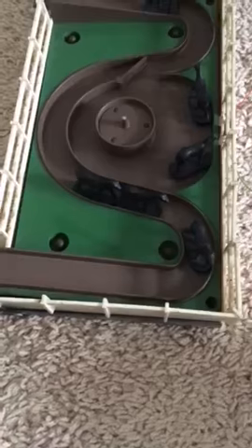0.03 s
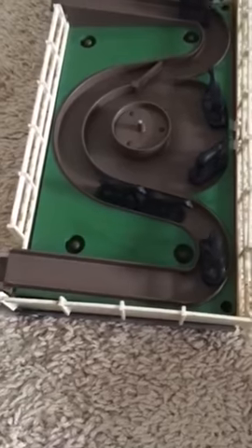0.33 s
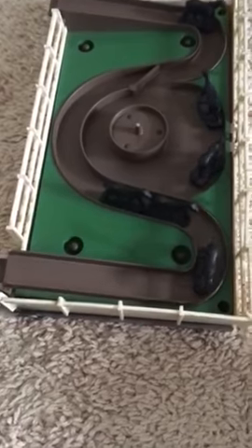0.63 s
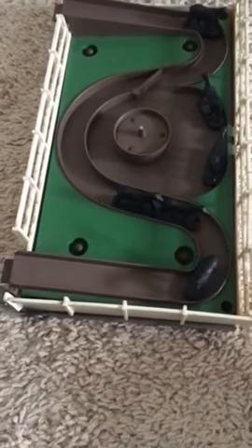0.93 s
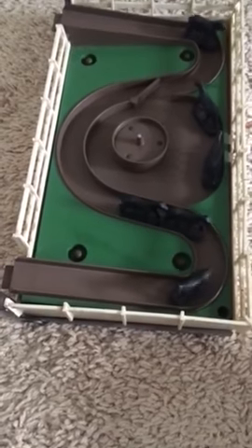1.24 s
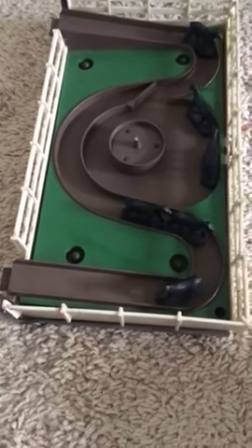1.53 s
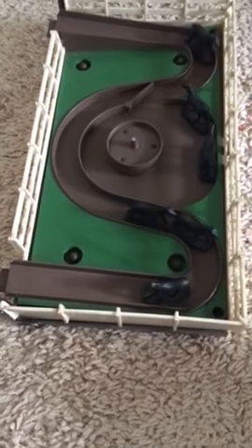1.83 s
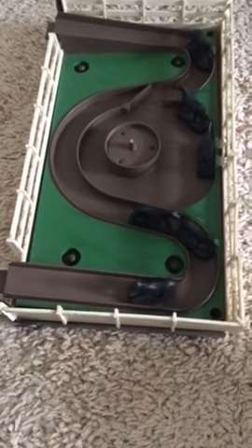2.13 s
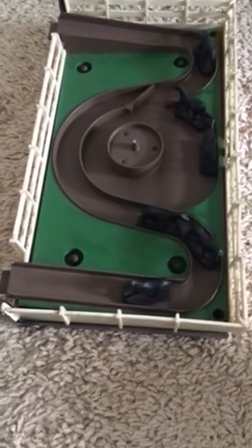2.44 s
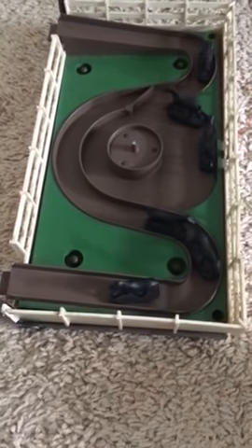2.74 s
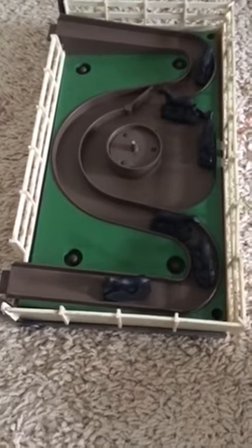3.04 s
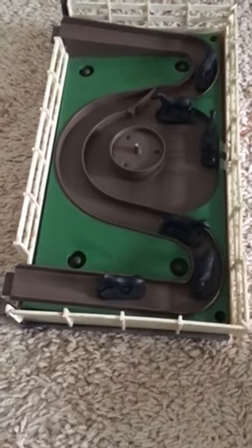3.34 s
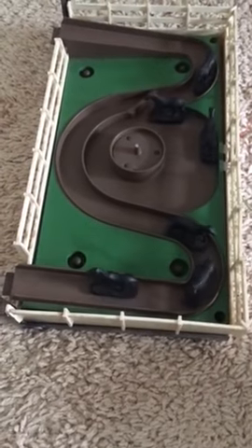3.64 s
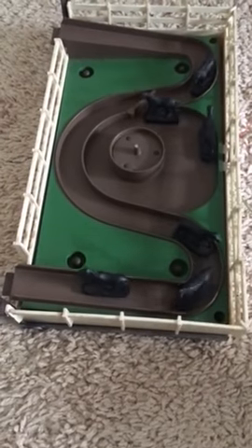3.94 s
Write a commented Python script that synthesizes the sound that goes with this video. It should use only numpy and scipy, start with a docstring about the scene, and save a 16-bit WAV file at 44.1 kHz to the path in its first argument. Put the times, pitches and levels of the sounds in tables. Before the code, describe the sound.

A vibrating plastic toy track buzzes steadily while small figures rattle along it.

```python
"""A mains-driven vibrator shakes a plastic toy track on a carpet; small figures creep along it.
The sound cuts in mid-run: the tray knocks 120 times a second, strong and weak by turns, and rings near
1 kHz; loose parts clatter, figures chatter, the coil hums over a faint room drone and rumble.
Harder knocks land at 0.74 and 1.24 s. The drone recedes at 1.8 s. From 2.6 s one figure's shrill tick
comes forward, with one more hard knock at 3.25 s."""
import sys
import numpy as np
from scipy import signal
from scipy.fft import rfft, irfft
from scipy.io import wavfile

SR = 44100
rng = np.random.default_rng(int(sys.argv[2]) if len(sys.argv) > 2 else 0)


def to_wav(sig):
    """Store sig (one row per channel, or 1-D mono) as 16-bit WAV at the path in sys.argv[1].

    Samples outside -1..1 are clipped; the rate is SR.
    """
    pcm = np.clip(np.atleast_2d(sig), -1, 1) * 32767
    pcm = np.round(pcm).astype(np.int16)
    wavfile.write(sys.argv[1], SR, pcm.T)  # frames by channels


N = 176400

STROKE_HZ, FIRST_STROKE_S = 120.053, .0009
LIMP_DEPTH, KNOCK_SCATTER_DB, KNOCK_JITTER_S, LATE_S_PER_DB = .95, 1.05, .00005, .000028
SWING_HZ, SWING_S, SWING_STOP_S = 975, .0042, .0008
CLATTER_T60_S, CLATTER_BUILD_S = .021, .0006
CHATTER_T60_S, CHATTER_BUILD_S = .016, .0016
TUMBLE_HZ, TUMBLE_DB = 55, -.5
MAINS_DB, DRONE_HZ, RUMBLE_DB = -64, 91, -55
ROOM_DB, ROOM_T60_S = -12.5, .18
START_S, CUTOFF_HZ = .084, 17100
TRIM_DB = .5  # added to the knock, clatter and chatter levels

# odd knocks over even, before LIMP_DEPTH: time_s, excess_db
KNOCK_LIMP = [(0.09, 2.4), (0.29, 4.4), (0.34, -0.3), (0.52, -2.3), (0.55, 4.8), (0.6, -4.3), (0.65, 4.4),
              (0.74, -6.2), (0.9, -5.0), (1.04, 10.3), (1.14, 6.5), (1.19, -0.9), (1.32, 7.1), (1.5, 2.3),
              (1.55, 6.2), (1.65, 1.5), (1.72, 6.7), (1.87, 4.9), (2.0, -3.0), (2.14, 4.4), (2.29, 8.2),
              (2.35, -6.9), (2.49, -5.2), (2.57, 5.5), (2.74, 5.8), (2.84, -7.5), (3.0, -2.2), (3.14, 7.0),
              (3.34, 2.9), (3.4, -7.8), (3.55, 6.5), (3.67, 7.5), (3.8, 0.0), (3.99, -0.0)]
# single harder knocks: time_s, extra_db
HARD_KNOCKS = [(.742, 2), (1.243, 3), (3.249, 2.5)]
# knock envelope: time_s, level_db
KNOCK_LEVEL = [(.1, -28), (.14, -28.5), (.25, -25.5), (.33, -27.3), (.55, -26), (.8, -26.3), (.87, -25.2),
               (1.05, -25.2), (1.14, -27.3), (1.27, -25.3), (1.35, -27.2), (1.7, -26.3), (1.82, -27.7),
               (1.88, -25.2), (2.02, -27), (2.16, -25), (2.25, -26.2), (2.35, -25.2), (2.5, -27),
               (2.66, -25.5), (2.78, -26.6), (2.87, -25), (2.96, -26.5), (3.03, -25.6), (4, -26.3)]
# tray response: freq_hz, gain_db
TRAY_COLOUR = [(100, -23), (380, -21), (425, -6), (480, 7), (540, 8), (600, -4), (660, 4), (720, 7),
               (780, 4.5), (840, 2.2), (900, 1.8), (960, .6), (1020, 2.5), (1080, 4), (1140, -1),
               (1200, 4.5), (1260, -6), (1320, 2.3), (1450, 3.5), (1560, -6), (2000, -7), (3000, -10),
               (8000, -25)]
# narrow tray modes: freq_hz, t60_s, level_db
TRAY_MODES = [(540, .15, -53), (1620, .14, -48.5), (1680, .14, -54.5), (1802, .14, -51.5), (1924, .1, -58),
              (1981, .1, -56.5), (2403, .08, -57)]

# loose-part hits: phase_strokes, gain_db
LOOSE_PARTS = [(.92, 0), (.08, -1), (.34, -1.5), (.65, -5)]
# loose-part response: freq_hz, gain_db
CLATTER_COLOUR = [(200, -26), (550, -6), (1000, -2), (1350, 0), (1500, -3.5), (1950, -3), (2150, -4.5),
                  (2320, -12), (2450, -9), (2800, -20), (4000, -26), (9000, -50)]
# loose-part modes: freq_hz, t60_s, gain_db
CLATTER_MODES = [(1620, .08, -15), (2425, .06, -13.5), (2470, .05, -18), (3050, .07, -17.5),
                 (3245, .07, -21)]
# clatter envelope: time_s, level_db
CLATTER_LEVEL = [(0.1, -43), (0.25, -38), (0.47, -44), (0.54, -40), (0.74, -40), (0.8, -44), (0.87, -39),
                 (1.21, -43), (1.29, -38), (1.37, -42), (2.6, -41), (2.78, -43), (2.89, -39), (3.98, -41)]

# figure landings per two-stroke cycle: phase_cycles, gain_db
FIGURES = [(.25, -6), (.77, -5)]
# liveliest figure's double landing: phase_strokes, gain_db
HOPPER = [(.78, 1.5), (.04, 0)]
# its bias to one stroke of each pair: time_s, bias_db
HOPPER_LIMP = [(.1, 6), (.7, 12), (.82, -3), (.95, 8), (1.08, -12), (1.28, -12), (1.38, 2), (2.9, 2),
               (3.1, 6), (3.35, 0), (3.6, 10), (3.8, -2)]
# figure response: freq_hz, gain_db
CHATTER_COLOUR = [(500, -20), (2000, -3), (3200, -2), (4000, -2.5), (5100, -2.5), (6400, 1), (7500, -1.5),
                  (8600, 1), (9600, -3), (10300, -6), (11000, -3.2), (13000, -3.8), (15400, -6.5),
                  (17000, -16)]
# figure modes: freq_hz, t60_s, gain_db
CHATTER_MODES = [(3660, .05, -21), (4390, .05, -19.5), (5130, .05, -22), (5790, .045, -13.5),
                 (6120, .06, -21), (6440, .04, -15), (6770, .03, -14.5), (7255, .045, -17),
                 (7905, .035, -12.5), (8270, .04, -13), (8660, .04, -15)]
# chatter envelope: time_s, level_db
CHATTER_LEVEL = [(.1, -42), (.12, -46), (.16, -42), (.27, -40.5), (.36, -45), (.66, -41.5), (.78, -46.5),
                 (.87, -39.5), (.95, -44), (1.38, -44), (1.44, -41), (1.51, -44.5), (1.57, -41),
                 (1.68, -43.5), (1.87, -41), (1.95, -44.5), (2.09, -45), (2.15, -41), (2.26, -44),
                 (2.36, -42.5), (2.46, -46), (2.64, -42.5), (2.75, -44), (3.4, -43.5), (4, -42)]

# coil harmonics of the stroke rate: time_s, first_db, second_db, third_db
HUM_LEVELS = [(0.1, -54.5, -53, -55), (.9, -54.5, -55, -53), (.98, -54.5, -49, -58),
              (1.55, -54.5, -54.5, -58.5), (1.72, -54.5, -49.5, -58.5), (1.9, -55, -52.5, -58.5),
              (4, -55, -51, -58.5)]
# room drone envelope: time_s, level_db
DRONE_LEVEL = [(0, -54), (.9, -51), (1.7, -54), (1.8, -61), (4, -63)]
# room rumble spectrum: freq_hz, gain_db
RUMBLE_COLOUR = [(20, -30), (32, -14), (42, 3), (60, 1), (100, -5), (140, -8), (190, -1), (300, -7),
                 (600, -10), (2000, -22), (16000, -40)]

# shrill figure's response: freq_hz, gain_db
SHRILL_COLOUR = [(2000, -22), (8000, -12), (8900, -2), (9400, -12), (16000, -14)]
# its modes: freq_hz, t60_s, gain_db
SHRILL_MODES = [(8930, .04, -3), (9080, .03, -7)]
# its envelope: time_s, level_db
SHRILL_LEVEL = [(0, -66), (2.6, -62), (3.25, -55), (3.45, -49.5), (4, -49.5)]


def undb(db):
    """Decibels to gain."""
    return 10 ** (np.asarray(db) / 20)


def unit(x):
    """Scale to rms 1."""
    return x / np.sqrt(np.mean(x ** 2))


def curve(rows, t, column=1):
    """Table column interpolated at times t."""
    rows = np.array(rows)
    return np.interp(t, rows[:, 0], rows[:, column])


def wander(t, rate_hz):
    """Slow random drift, spread near 1."""
    return 1.2 * np.interp(t * rate_hz, np.arange(512), rng.standard_normal(512))


def colour(x, response):
    """Minimum-phase filter from freq_hz, gain_db rows."""
    hz, db = np.array(response).T
    bins_hz = np.arange(4097) * SR / 8192
    log_gain = np.log(undb(np.interp(np.log(bins_hz + 1), np.log(hz), db)))
    cepstrum = irfft(log_gain)
    cepstrum[1:4096] *= 2
    cepstrum[4097:] = 0
    return signal.fftconvolve(x, irfft(np.exp(rfft(cepstrum))))[:len(x)]


def pulses(times_s, db):
    """Windowed-sinc impulses placed between samples."""
    at = times_s[:, None] * SR
    taps = np.floor(at).astype(int) + np.arange(-7, 9)
    shape = np.sinc(taps - at) * np.sinc((taps - at) / 8) * undb(db)[:, None]
    inside = (taps >= 0) & (taps < N)
    return np.bincount(taps[inside], shape[inside], N)


def fade(t60_s, size=8192):
    """Exponential decay of unit energy."""
    decay = np.exp(-np.log(1000) * np.arange(size) / SR / t60_s)
    return decay / np.sqrt(np.sum(decay ** 2))


def ring(hits, modes):
    """Damped modes struck by the hits."""
    total = 0
    for hz, t60_s, db in modes:
        pole = np.exp((2j * np.pi * hz - np.log(1000) / t60_s) / SR)
        total += undb(db) * unit(signal.lfilter([1, 0, -1], [1, -2 * pole.real, abs(pole) ** 2], hits))
    return total


def bounces(rate_hz, parts, jitter_s, scatter_db, drift_db, drift_hz, limp_db):
    """Hit times and strengths of parts locked to the vibrator, at times high and low by turns."""
    cycle = np.arange(int(N / SR * rate_hz) + 1)
    cycle_s = cycle / rate_hz
    times_s, hits_db = [], []
    for phase, db in parts:
        jitter, scatter = rng.standard_normal((len(cycle), 2)).T
        times_s.append((cycle + phase) / rate_hz + jitter_s * jitter)
        swing_db = limp_db * (-1) ** cycle * np.tanh(2 * wander(cycle_s, drift_hz / 2))
        hits_db.append(db + swing_db + scatter_db * scatter + drift_db * wander(cycle_s, drift_hz))
    return times_s, hits_db


def rattle(times_s, hits_db, response, modes, t60_s, build_s, scrape):
    """Hits on plastic: dense short ring, a few clear modes, fresh scrape noise per hit."""
    hits = pulses(np.concatenate(times_s), np.concatenate(hits_db))
    envelope = fade(t60_s)
    envelope *= 1 - np.exp(-np.arange(len(envelope)) / SR / build_s)
    body = signal.fftconvolve(hits, envelope * rng.standard_normal(len(envelope)))[:N]
    energy = np.abs(signal.fftconvolve(hits ** 2, envelope ** 2)[:N])
    grit = np.sqrt(energy) * rng.standard_normal(N)
    return unit(unit(colour(body + scrape * grit, response)) + ring(hits, modes))


def tray_knocks(t):
    """One knock per stroke, strong and weak by turns; a higher bounce lands later."""
    stroke = np.arange(int(N / SR * STROKE_HZ) + 1)
    times_s = FIRST_STROKE_S + stroke / STROKE_HZ
    limp_db = LIMP_DEPTH * curve(KNOCK_LIMP, times_s)
    db = (stroke % 2 - .5) * limp_db + KNOCK_SCATTER_DB * rng.standard_normal(len(stroke))
    for at_s, extra_db in HARD_KNOCKS:
        db[np.argmin(abs(times_s - at_s))] += extra_db
    times_s = times_s + LATE_S_PER_DB * db + KNOCK_JITTER_S * rng.standard_normal(len(stroke))
    pair_db = 10 * np.log10(np.cosh(limp_db * np.log(10) / 20))
    knocks = pulses(times_s, db - pair_db)  # pair energy independent of limp
    # the tray's swing swells until the next contact stops it
    age_s = np.arange(512) / SR
    swell = np.interp(age_s, [0, SWING_S, SWING_S + SWING_STOP_S], [.55, 1, 0])
    swings = signal.fftconvolve(knocks, swell * np.sin(2 * np.pi * SWING_HZ * age_s))[:N]
    body = unit(colour(swings, TRAY_COLOUR)) * undb(curve(KNOCK_LEVEL, t) + TRIM_DB)
    return body + ring(knocks, TRAY_MODES)


def loose_clatter(t):
    """Loose parts strike the track once per stroke, in flurries."""
    times_s, hits_db = bounces(STROKE_HZ, LOOSE_PARTS, jitter_s=.00016, scatter_db=2.4,
                               drift_db=1.2, drift_hz=8, limp_db=.8)
    clatter = rattle(times_s, hits_db, CLATTER_COLOUR, CLATTER_MODES,
                     CLATTER_T60_S, CLATTER_BUILD_S, scrape=.7)
    return clatter * undb(curve(CLATTER_LEVEL, t) + TRIM_DB)


def figure_chatter(t):
    """Figures hop and land about every second stroke, ticking brightly."""
    times_s, hits_db = bounces(STROKE_HZ / 2, FIGURES, jitter_s=.0004, scatter_db=2.4,
                               drift_db=1.8, drift_hz=9, limp_db=1.5)
    # the liveliest lands twice in quick succession
    stroke = np.arange(int(N / SR * STROKE_HZ))
    for landing, (phase, db) in enumerate(HOPPER):
        at_s = (stroke + landing + phase) / STROKE_HZ + .0001 * rng.standard_normal(len(stroke))
        bias = undb((-1) ** stroke * curve(HOPPER_LIMP, at_s))
        share_db = 20 * np.log10(bias / np.hypot(1, bias))
        times_s.append(at_s)
        hits_db.append(db + share_db + 2.1 * rng.standard_normal(len(stroke)) + 1.4 * wander(at_s, 14))
    # another tumbles out of step
    jitter, scatter = rng.standard_normal((300, 2)).T
    times_s.append(np.cumsum(np.exp(.12 * jitter)) / TUMBLE_HZ)
    hits_db.append(TUMBLE_DB + 2.2 * scatter)
    chatter = rattle(times_s, hits_db, CHATTER_COLOUR, CHATTER_MODES,
                     CHATTER_T60_S, CHATTER_BUILD_S, scrape=.7)
    return chatter * undb(curve(CHATTER_LEVEL, t) + TRIM_DB)


def coil_hum(t):
    """Wavering harmonics of the mains, which runs at half the stroke rate."""
    partials = [(.5, MAINS_DB)] + [(k, curve(HUM_LEVELS, t, column=k)) for k in (1, 2, 3)]
    hum = 0
    for ratio, db in partials:
        peak = np.sqrt(2) * undb(db + 1.1 * wander(t, 9))
        hum += peak * np.sin(2 * np.pi * (ratio * STROKE_HZ * t + rng.random()))
    return hum


def room_background(t):
    """Low drone over noise rumble."""
    phase_rad = 2 * np.pi * DRONE_HZ * t + .4 * wander(t, 6)
    drone = np.sqrt(2) * undb(curve(DRONE_LEVEL, t)) * np.sin(phase_rad)
    return drone + undb(RUMBLE_DB) * unit(colour(rng.standard_normal(N), RUMBLE_COLOUR))


def shrill_figure(t):
    """One figure's 9 kHz tick comes forward as it creeps on."""
    times_s, hits_db = bounces(STROKE_HZ / 2, [(.9, 0)], jitter_s=.00015, scatter_db=2.2,
                               drift_db=1, drift_hz=9, limp_db=1.2)
    ticks = rattle(times_s, hits_db, SHRILL_COLOUR, SHRILL_MODES,
                   CHATTER_T60_S, CHATTER_BUILD_S, scrape=.6)
    return ticks * undb(curve(SHRILL_LEVEL, t))


def scene():
    """The toy, close by in a small carpeted room; reverb on the rattles only."""
    t = np.arange(N) / SR
    rattles = loose_clatter(t) + figure_chatter(t) + shrill_figure(t)
    tail = fade(ROOM_T60_S, size=16384) * rng.standard_normal(16384)
    reverb = undb(ROOM_DB) * signal.fftconvolve(rattles, tail)[:N]
    return (tray_knocks(t) + rattles + reverb + coil_hum(t) + room_background(t))[None]


def record(dry):
    """Abrupt cut-in, steep low-pass."""
    gate = np.arange(N) / SR >= START_S
    return signal.sosfilt(signal.ellip(8, .2, 70, CUTOFF_HZ, fs=SR, output="sos"), dry * gate)


dry = scene()
out = record(dry)
to_wav(out)
```